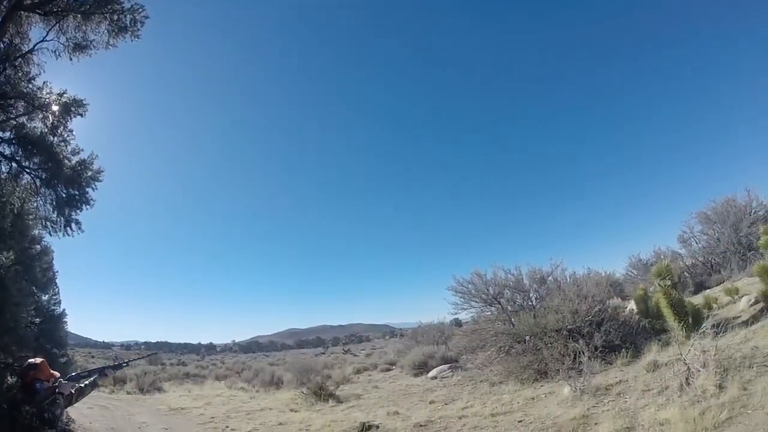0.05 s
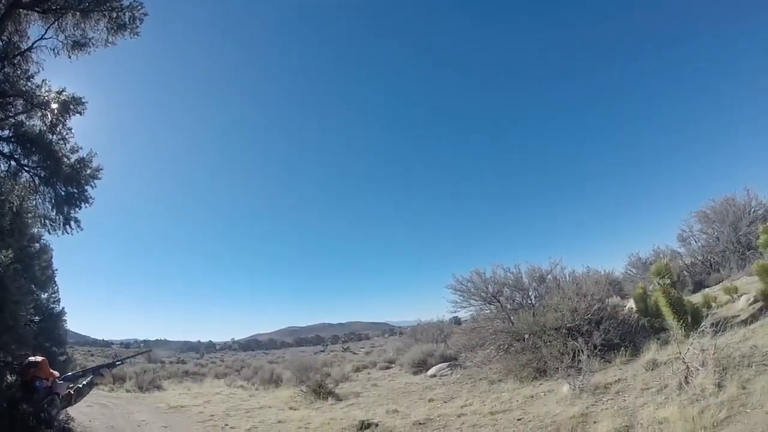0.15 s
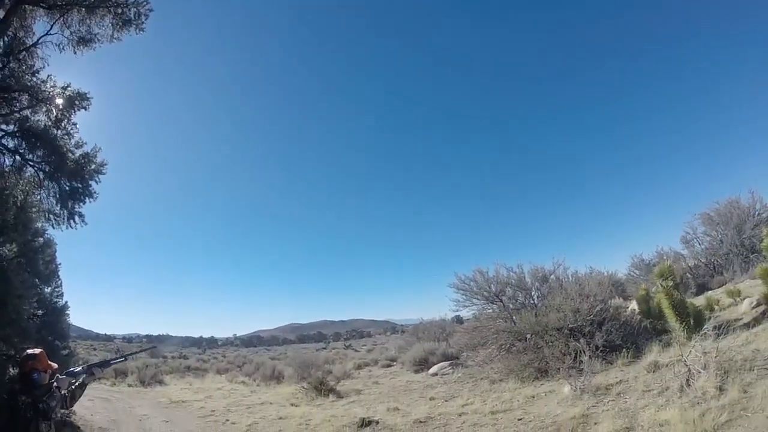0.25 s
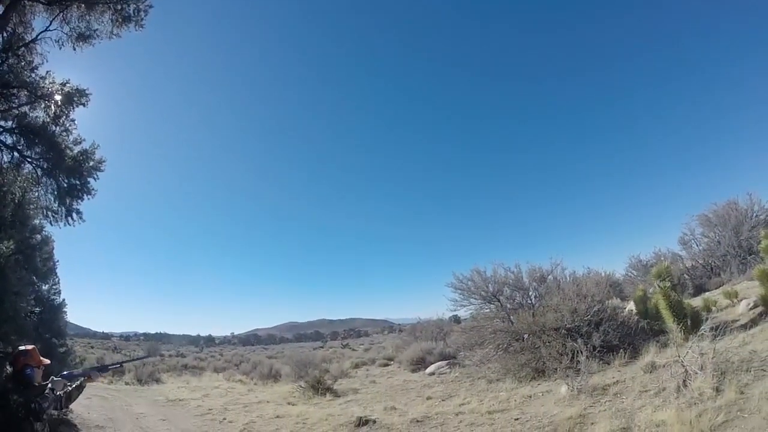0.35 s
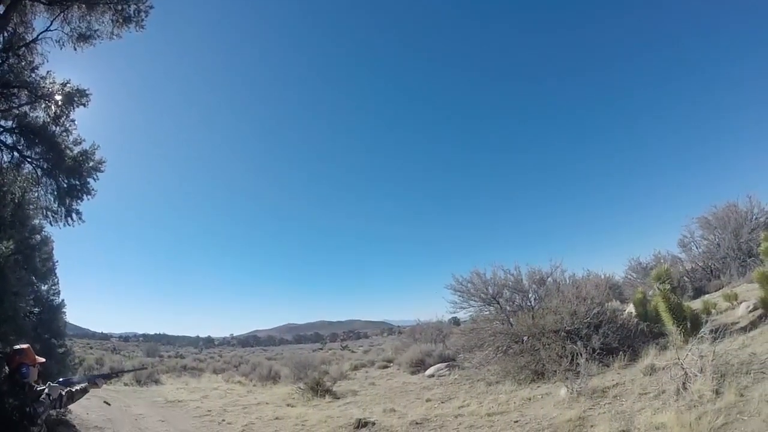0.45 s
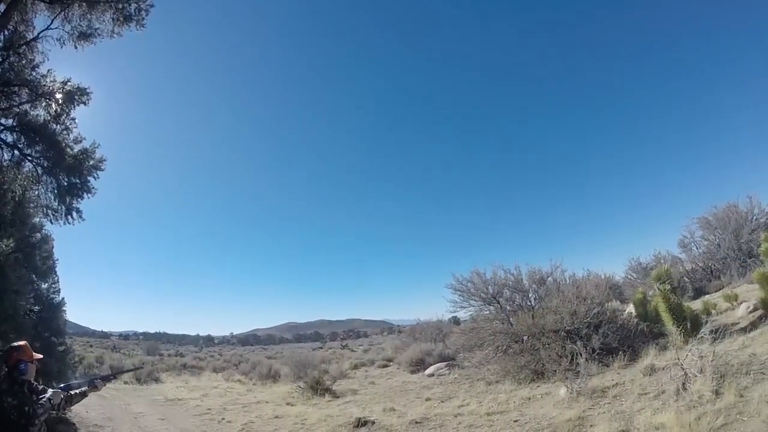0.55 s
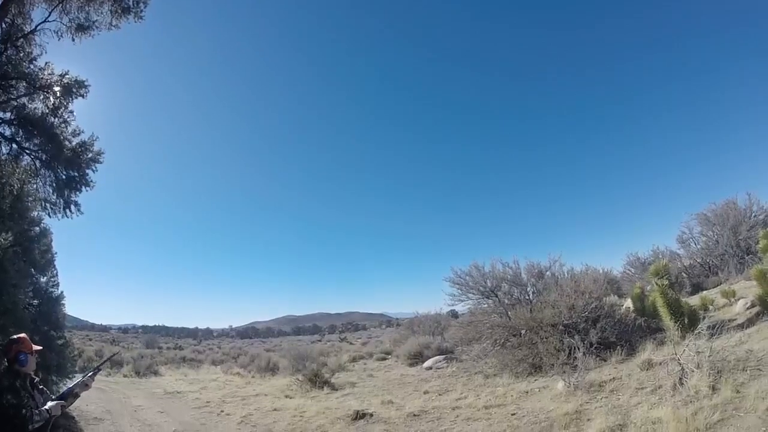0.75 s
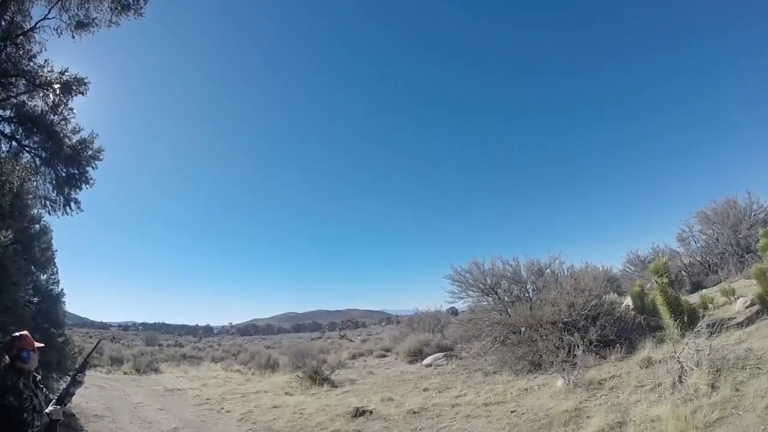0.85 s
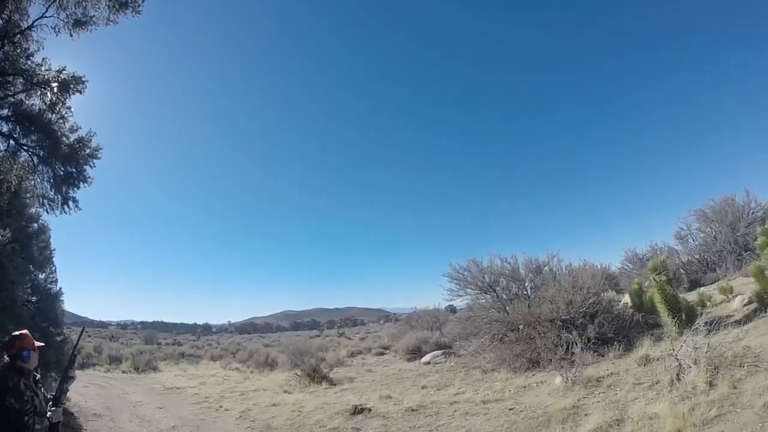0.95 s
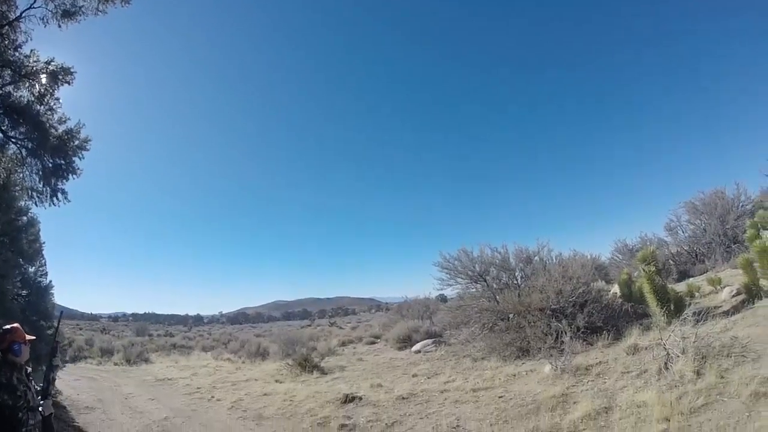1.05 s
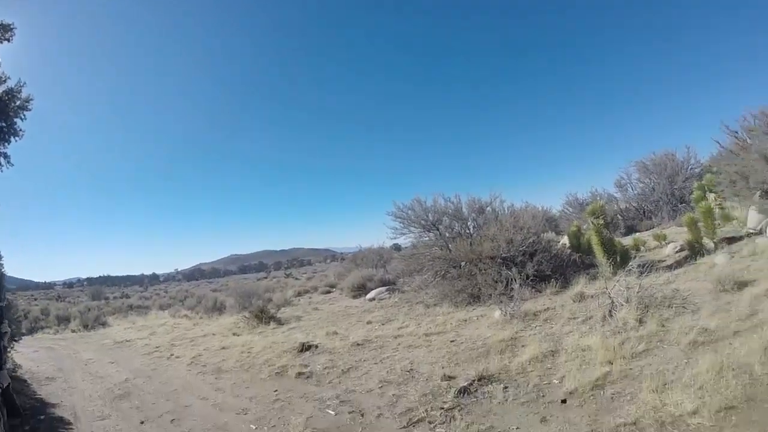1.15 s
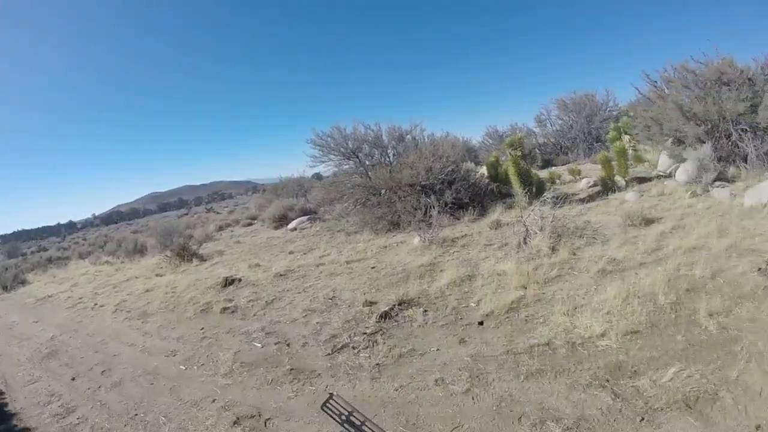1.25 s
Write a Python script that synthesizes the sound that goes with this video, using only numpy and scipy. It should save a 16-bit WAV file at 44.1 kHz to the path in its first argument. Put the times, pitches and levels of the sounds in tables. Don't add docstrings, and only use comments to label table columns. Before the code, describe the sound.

A single sharp shotgun blast cracks across open scrub, then brief echoes and faint action clicks.

```python
import sys
import numpy as np
from scipy import signal
from scipy.fft import rfft, irfft
from scipy.io import wavfile

SR = 44100
rng = np.random.default_rng(int(sys.argv[2]) if len(sys.argv) > 2 else 0)


def attenuation_scalar(level_db):
    decades = np.asarray(level_db, float) / 20
    return 10 ** decades


def to_wav(sig):
    pcm = np.clip(np.atleast_2d(sig), -1, 1) * 32767
    pcm = np.round(pcm).astype(np.int16)
    wavfile.write(sys.argv[1], SR, pcm.T)


N = 57330
SHOT_S = .23842


def evened(x):
    return x / np.sqrt(np.mean(x ** 2) + 1e-20)


def spectrum_db(points, hz):
    f, db = np.transpose(points)
    return np.interp(np.log(hz + 1), np.log(f + 1), db)


def add(mix, s, sound):
    part = mix[round(s * SR):][:len(sound)]
    part += sound[:len(part)]


def bandpass(x, low_hz, top_hz):
    return signal.sosfilt(signal.butter(3, [low_hz, top_hz], "bandpass", fs=SR, output="sos"), x)


# delay/ms, peak level/dB, pulse length/ms
BLAST_FRONTS = [
    (0.02, 8, 0.15),
    (0.26, 16, 0.09),
    (1.05, -1, 0.25),
    (1.83, 9, 0.11),
    (2.32, 8, 0.09),
    (3.48, 2, 0.09),
    (5.83, 4, 0.15),
    (6.96, 3, 0.08),
]


def blast():
    pressure = np.zeros(N)
    t = np.arange(N) / SR
    for late_ms, db, ms in BLAST_FRONTS:
        since = t - SHOT_S - late_ms / 1000
        u = np.maximum(since, 0) * 1000 / ms
        rise = np.clip(since * SR, 0, 1)
        pressure -= attenuation_scalar(db) * rise * (1 - u) * np.exp(-u)
    push_hz, push_db, push_t60_s = 242, -23.5, .034
    since = np.maximum(t - SHOT_S, 0)
    push = attenuation_scalar(push_db - 60 * since / push_t60_s) * np.sin(2 * np.pi * push_hz * since)
    return through_case(pressure) + push


# f/Hz, level/dB, t60/s
CASE_MODES = [(370.0, -4, 0.012), (1120.0, -31, 0.017), (1800.0, -17, 0.017), (2640.0, -28, 0.005),
              (3010.0, 5, 0.017), (3480.0, -2, 0.017), (4300.0, -1, 0.006), (5460.0, -5, 0.015),
              (6280.0, 1, 0.008), (6650.0, -7, 0.012), (7770.0, -24, 0.017), (8980.0, -22, 0.014),
              (10580.0, -13, 0.012), (12540.0, -31, 0.017)]


def through_case(pressure):
    longest_t60_s = .017
    t = np.arange(2048) / SR
    ring = np.zeros(2048)
    for hz, db, t60 in CASE_MODES:
        ring += attenuation_scalar(db - 60 * t / min(t60, longest_t60_s)) * np.sin(2 * np.pi * hz * t)
    heard = signal.fftconvolve(pressure, ring / np.linalg.norm(ring))[:N]
    return bandpass(heard, 220, 13500)


# f/Hz, width/Hz, level/dB
DIFFUSE_MODES = [(1150, 100, -16.5), (1910, 120, -2), (3040, 450, -1.5), (3493, 430, -2.5),
                 (5400, 170, -22), (6400, 1600, -24.5)]


def case_colour(hz):
    power = sum(attenuation_scalar(2 * db) / (1 + (2 * (hz - f) / width) ** 2) ** 2 for f, width, db in DIFFUSE_MODES)
    return np.sqrt(power)


# f/Hz, level/dB per Hz
NEAR_SPECTRUM = [(90, -22), (250, -5), (700, -9.5), (2000, 0.5), (4500, -3.5), (6500, -10.5), (9000, -20),
                 (15000, -27.5)]


def near_colour(hz, late_s=0):
    air_db_per_s_at_10k = 61
    return attenuation_scalar(spectrum_db(NEAR_SPECTRUM, hz) - air_db_per_s_at_10k * late_s * (hz / 10000) ** 2)


def reflections(colour):
    taps_per_s, spread_db = 6000, 2
    struck = rng.random(N) < taps_per_s / SR
    strength = attenuation_scalar(spread_db * rng.exponential(1, N).clip(0, 4))
    taps = struck * rng.standard_normal(N) * strength
    hz, t, z = signal.stft(evened(taps), SR, nperseg=256)
    gain = colour(hz[:, None], np.maximum(t - SHOT_S, 0))
    gain = gain / np.sqrt(np.mean(gain[:, :1] ** 2))
    return signal.istft(z * gain, SR, nperseg=256)[1][:N]


# t/s, level/dB
FAR_LEVEL = [
    (0.241, -27),
    (0.25, -17.5),
    (.26, -15.5),
    (0.299, -25.5),
    (0.356, -28.5),
    (0.373, -34),
    (0.451, -43),
    (0.599, -54.5),
    (.8, -71),
]


def scatter():
    t = np.arange(N) / SR
    s, level_db = np.transpose(FAR_LEVEL)
    near_db = -19 - 128 * (t - s[0])
    near_end_s, edge_s, drop_db = .36, .015, 9
    near_db -= drop_db * np.clip((t - near_end_s) / edge_s, 0, 1)
    near = reflections(near_colour) * attenuation_scalar(np.minimum(near_db, 0))
    far = reflections(lambda hz, late_s: case_colour(hz)) * attenuation_scalar(np.interp(t, s, level_db, right=-150))
    return (t > s[0]) * (near + far)


# t/s, peak level/dB, length/ms, brightness/dB per octave
SLAP_EVENTS = [
    (.287, -11, 3, 3),
    (.291, -9, 3, -3),
    (.324, -19, 3, 3),
    (.345, -22, 3, 3),
    (.353, -18, 4, 3),
    (.41, -31, 3, 5),
    (.69, -48, 4, 0),
]


def slaps():
    out = np.zeros(N)
    t = np.arange(1024) / SR
    hz = np.fft.rfftfreq(1024, 1 / SR)
    octaves = np.log2(hz.clip(600, 6500) / 3000)
    for s, db, ms, tilt_db in SLAP_EVENTS:
        tilt = attenuation_scalar(np.clip(tilt_db, -3, 5) * octaves)
        colour = (case_colour(hz) + .3 * near_colour(hz)) * tilt
        smear = evened(irfft(rfft(rng.standard_normal(1024)) * colour))
        envelope = np.minimum(t / .001, 1) * np.exp(-t * 2000 / ms)
        add(out, s, attenuation_scalar(db) * smear * envelope)
    return out


# f/Hz, level/dB, t60/s
STEEL_MODES = [(1790, -5, .014), (2980, -2, .011), (3400, 0, .013), (4400, -9, .005), (5400, -13, .007),
               (6650, -7, .009), (7250, -9, .008), (9000, -22, .006), (12500, -28, .005)]
# t/s, level/dB, rattle length/ms, brightness/dB per octave
KNOCK_EVENTS = [(.4729, -33, 2, -5), (.5262, -48, 3, 2), (.5292, -39, 7, -1), (.5384, -33, 5, -2),
                (.5459, -29, 1.5, 5), (.5488, -38, 2, -2), (.5512, -41, 4, 0), (.556, -46, 14, -3),
                (.568, -50, 15, -2), (.9587, -54, 3, 1), (.966, -58, 3, -3)]


def action():
    out = np.zeros(N)
    t = np.arange(1500) / SR
    for s, db, ms, tilt_db in KNOCK_EVENTS:
        jitter, side, force = rng.random((3, 12))
        at = (ms * SR / 1000 * (np.arange(12) + jitter) / 12).astype(int)
        rattle = np.zeros(700)
        np.add.at(rattle, at, np.sign(side - .5) * (.3 + force) * np.hanning(20)[5:17])
        ring = np.zeros(1500)
        for f, mode_db, t60 in STEEL_MODES:
            tilted_db = mode_db + tilt_db * np.log2(f / 3000)
            ring += attenuation_scalar(tilted_db - 60 * t / t60) * np.sin(2 * np.pi * f * t)
        knock = bandpass(np.convolve(rattle, ring), 1600, 11000)
        add(out, s, attenuation_scalar(db + 10) * knock / abs(knock).max())
    return out


# t/s, peak level/dB, f/Hz, t60/s
TICK_EVENTS = [
    (1.021, -57.5, 3650, 0.027),
    (1.021, -54, 3940, 0.037),
    (1.04, -55, 3704, 0.021),
]


def ticks():
    out = np.zeros(N)
    t = np.arange(1500) / SR
    for s, db, hz, t60 in TICK_EVENTS:
        add(out, s, attenuation_scalar(db - 60 * t / t60) * np.minimum(t / .0011, 1) * np.sin(2 * np.pi * hz * t))
    return out


def coloured(points):
    hz = np.fft.rfftfreq(N, 1 / SR)
    noise = rfft(rng.standard_normal(N))
    return evened(irfft(noise * attenuation_scalar(spectrum_db(points, hz)) * (hz > 12), N))


# f/Hz, level/dB per Hz
WIND_SPECTRUM = [(15, -10.5), (30, 0), (55, 3.5), (100, -9), (250, -17), (600, -40.5)]
# t/s, level/dB
BREEZE_LEVEL = [
    (0, -2),
    (.14, 3.5),
    (.22, -2),
    (.36, 9.5),
    (.45, 2),
    (1.05, -2.5),
    (1.18, 2.5),
    (1.3, 5),
]


def wind():
    t = np.arange(N) / SR
    gust_db, gust_top_hz = 2.5, 12
    gust = np.zeros(N)
    for f in gust_top_hz * np.geomspace(.1, 1, 16):
        gust += np.sin(2 * np.pi * (f * t + rng.random())) / np.sqrt(f)
    level_db = -63.5 + gust_db * evened(gust) + np.interp(t, *np.transpose(BREEZE_LEVEL))
    return attenuation_scalar(level_db) * coloured(WIND_SPECTRUM)


# f/Hz, level/dB per Hz
HISS_SPECTRUM = [(59, -33.5), (100, 2), (277, -1.5), (373, -4), (1310, -12), (1830, -13.5), (5080, -22),
                 (13500, -36.5), (16000, -48.5)]


def hiss():
    return attenuation_scalar(-59) * coloured(HISS_SPECTRUM)


def scene():
    return (blast() + scatter() + slaps() + action() + ticks() + wind() + hiss())[None]


def band_limit(x):
    return signal.sosfilt(signal.butter(12, 16380, fs=SR, output="sos"), x)


def record(dry):
    duck_at_s, duck_db, fall_s, hold_s, recover_db_per_s = .2415, 12, .004, .3, 16.5
    since = np.arange(N) / SR - duck_at_s
    held_db = np.maximum(duck_db - recover_db_per_s * np.maximum(since - hold_s, 0), 0)
    gain_db = -np.clip(since / fall_s, 0, 1) * held_db
    ceiling, top_hz = .96, 15150
    clipped = np.clip(dry * attenuation_scalar(gain_db), -ceiling, ceiling)
    mix = signal.sosfiltfilt(signal.butter(12, top_hz, fs=SR, output="sos"), clipped)
    return band_limit(mix)


dry = scene()
out = record(dry)
to_wav(out)
```